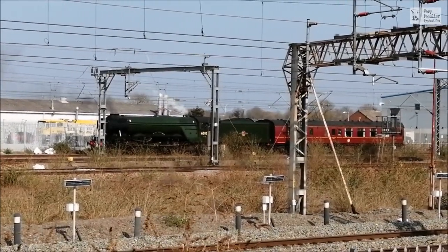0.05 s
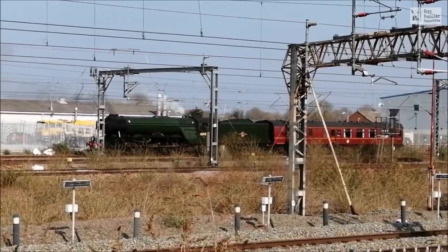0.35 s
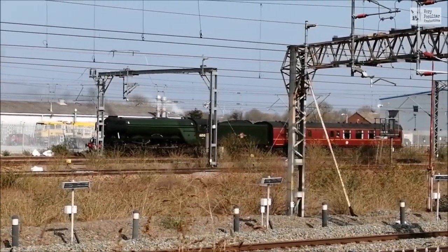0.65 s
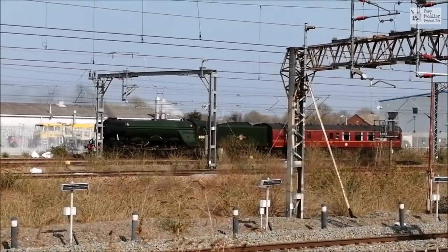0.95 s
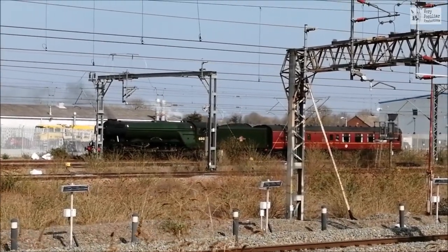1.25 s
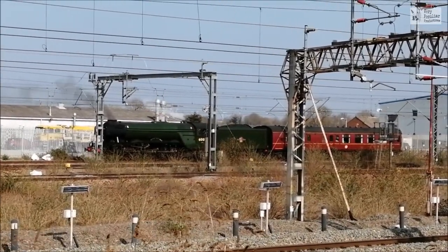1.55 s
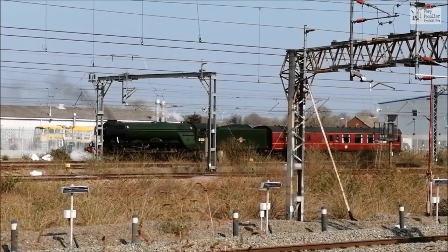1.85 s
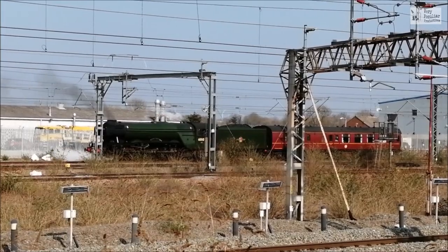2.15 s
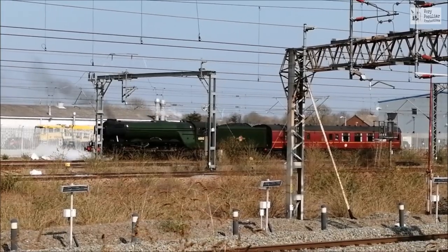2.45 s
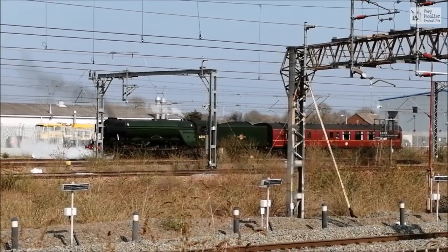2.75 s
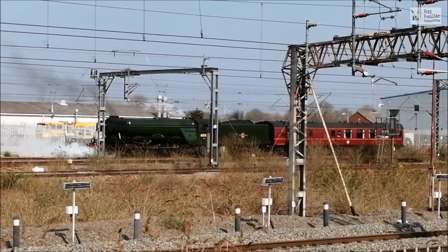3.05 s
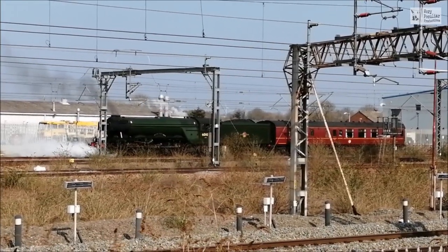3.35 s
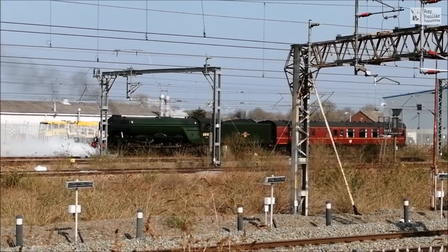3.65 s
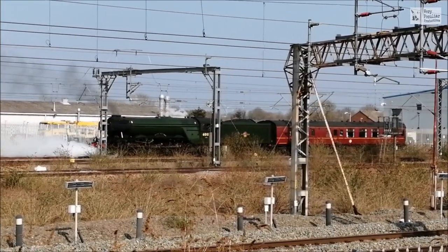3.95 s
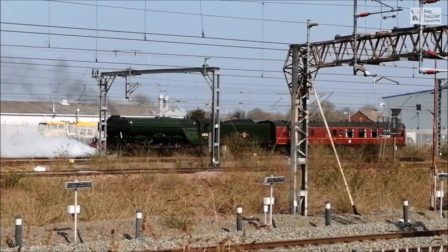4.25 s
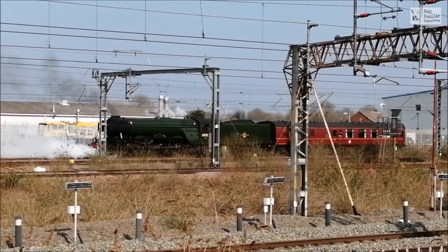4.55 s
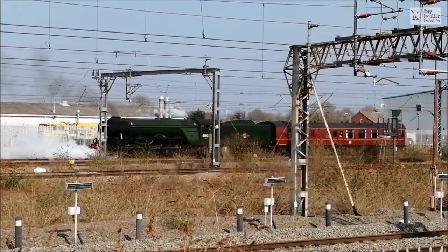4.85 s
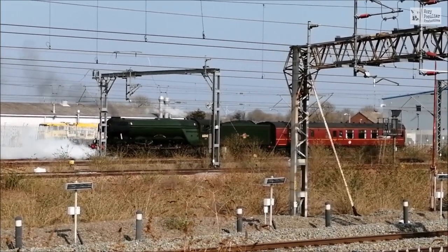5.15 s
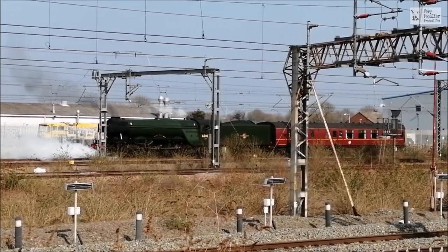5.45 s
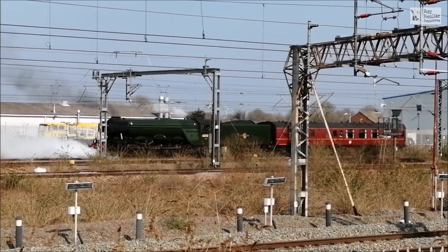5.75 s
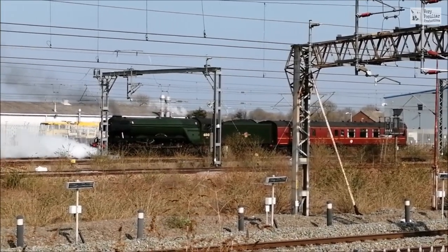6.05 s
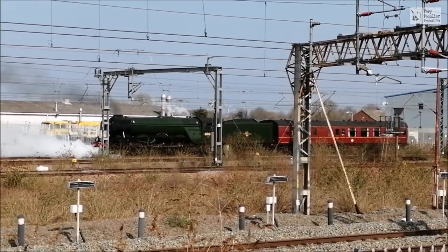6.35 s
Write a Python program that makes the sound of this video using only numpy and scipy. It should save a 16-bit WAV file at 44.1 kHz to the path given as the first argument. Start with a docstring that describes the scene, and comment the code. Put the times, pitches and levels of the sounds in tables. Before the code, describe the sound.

Low wind rumble and pops on the microphone, followed by a light clank and the sustained hiss of a far-off locomotive venting steam.

```python
"""A steam locomotive, heard from across a railway yard on a camera's two microphone ports.
Gusts buffet the ports at once, hardest at the start, while steam leaks softly far off, swells and settles.
At 1.6 s the linkage clanks and the first cylinder drain cock opens; the second follows at 2 s.
Their jet blows a broad, steady hiss to the end, drifting in the moving air,
with wind rumbling on the microphone and the low hum of the yard underneath."""
import sys
import numpy as np
from scipy import signal
from scipy.fft import rfft, irfft
from scipy.io import wavfile
from scipy.ndimage import uniform_filter1d

SR = 44100
rng = np.random.default_rng(int(sys.argv[2]) if len(sys.argv) > 2 else 0)


def transcribe(u):
    """Save the signal u as a 16-bit wav file named by the first command-line argument.

    u: samples, shape (n,) or (channels, n), limited to [-1, 1]; the rate is SR.
    q: integer samples, one column per channel.
    """
    v = np.clip(np.atleast_2d(u).T, -1, 1)
    q = np.round(v * 32767).astype(np.int16)
    wavfile.write(sys.argv[1], SR, q)


N = 291060
TIME = np.arange(N) / SR
BINS = np.fft.rfftfreq(N, 1 / SR)
COCKS_OPEN_S = (1.617, 1.996)


# The jet's roar, body, hiss and fizz. Each row: low edge in Hz, high edge in Hz.
JET_BANDS = [(600, 1500), (1600, 3600), (4200, 7400), (8000, 14500)]
# The jet's spectrum from across the yard. Each row: frequency in Hz, relative level in dB.
JET_SPECTRUM = [(100, -23), (300, -17), (500, -15), (1000, -14), (1800, -11), (2800, -7), (4000, -5),
                (5200, 0), (7000, -8.5), (7450, -13), (7800, -22.5), (9900, -24), (11000, -33.5),
                (15000, -37.5)]
# The jet leans from port to port. Each row: time in seconds, lean to the left in dB.
JET_LEAN = [(1.8, 8), (2.3, 3.5), (2.52, 4.5), (2.87, -1.5), (3.25, 4), (3.65, -2.5), (5.8, -2.5),
            (6.08, 2), (6.5, 0)]
def jet(opening_s=.04, roar_lean=0.84, hiss_pan_db=0.8, patchy_db=1.5):
    """The drain cocks blow: the middle of the spectrum comes first, roar and fizz as the jet builds."""
    steam = pipes_and_ports(distant_noise(JET_SPECTRUM))
    own_db = 20 * np.log10([[band_rms(steam, band)] for band in JET_BANDS])
    hz, t, frames = short_time(steam)
    levels_db = jet_levels(t) + 20 * np.log10(np.maximum(cock_opening(t), .01))
    centres = np.sqrt(np.prod(JET_BANDS, axis=1))
    # each frequency blends the bands on either side of it
    shares = np.array([at_hz(list(zip(centres, row)), hz) for row in np.eye(len(JET_BANDS))]).T
    swell_db = shares @ (levels_db - own_db) + jet_resonances(hz, t)
    lean = at_time(JET_LEAN, t)[0]
    roar_pan, hiss_pan = roar_lean * lean, lean + hiss_pan_db
    lean_db = shares @ np.array([roar_pan, (roar_pan + hiss_pan) / 2, hiss_pan, 0 * t])  # fizz stays put
    steam = waveform(frames * amp(swell_db) * sides(lean_db).reshape(frames.shape))
    onset = np.clip((TIME - COCKS_OPEN_S[0]) / opening_s, 0, 1)
    return moving_air(steam, patchy_db) * onset


# How roar, body, hiss and fizz build once a cock opens.
# Each row: lag in seconds, rise in seconds, gain in dB with only the first cock open.
BAND_BUILD = [(0.024, 0.1, -3), (0, 0.16, -3), (0.076, 0.12, -8), (0.11, 0.55, -14)]
def cock_opening(t):
    """Gain of each band of the jet as first one cock opens, then the other."""
    gains = []
    for lag_s, rise_s, first_db in BAND_BUILD:
        first, second = (np.clip((t - s - lag_s) / rise_s, 0, 1) for s in COCKS_OPEN_S)
        gains.append(amp(first_db) * first + (1 - amp(first_db)) * second)
    return np.array(gains)


# Three bands of the jet drift on their way over the yard. Each row: time in seconds, level in dB.
ROAR_DRIFT = [(1.7, -52), (2.05, -46), (2.4, -44), (3.05, -42), (3.28, -47.5), (3.58, -39), (4.1, -43.5),
              (4.5, -37.5), (5.15, -45.5), (5.5, -43), (5.78, -39.5), (6.0, -47), (6.25, -44), (6.42, -40)]
BODY_DRIFT = [(1.9, -30.5), (2.08, -27), (2.3, -31.5), (2.53, -27.5), (2.75, -34.5), (2.95, -29),
              (3.1, -32.5), (3.3, -29), (3.7, -32), (4.05, -27), (4.35, -28.5), (4.55, -28.5), (4.8, -32),
              (5.03, -27), (5.18, -36), (5.6, -33), (5.84, -26.5), (5.97, -33), (6.48, -32.5), (6.6, -36.5)]
HISS_DRIFT = [(2.2, -28), (2.56, -28), (2.72, -30), (2.93, -29.5), (3.07, -25), (3.36, -31), (3.53, -33.5),
              (3.68, -31), (3.83, -32), (4.5, -34.5), (4.68, -31), (4.95, -32.5), (5.1, -29), (5.54, -31),
              (5.68, -37), (5.89, -29.5), (6.3, -39), (6.55, -31.5)]
# Short spurts of fizz. Each row: centre in seconds, half length in seconds, rise in dB.
FIZZ_SPURTS = [(1.82, 0.04, 9), (2.096, 0.047, 10), (2.38, 0.043, 2), (2.602, 0.037, 7), (2.88, 0.063, 4.5),
               (3.074, 0.1, 6), (3.605, 0.07, 3), (4.163, 0.14, 11.5), (5.1, 0.067, 8), (5.247, .1, 7),
               (5.723, 0.058, 7.5), (5.956, 0.066, 7.5)]
def jet_levels(t, fizz_db=-56.0, fizz_follows=0.31, flicker_db=1.7, flicker_hz=10):
    """Levels of roar, body, hiss and fizz in dB; the fizz follows the hiss, flickers and spurts."""
    roar, body, hiss = (at_time(curve, t)[0] for curve in (ROAR_DRIFT, BODY_DRIFT, HISS_DRIFT))
    mean_hiss = np.mean(HISS_DRIFT, axis=0)[1]
    flicker = flicker_db * np.interp(t, TIME, wander(flicker_hz))
    spurts = sum(db * swell(t, s, half_s) for s, half_s, db in FIZZ_SPURTS)
    fizz = fizz_db + fizz_follows * (hiss - mean_hiss) + flicker + spurts
    return np.array([roar, body, hiss, fizz])


# The whistling edge of the hiss. Each row: time in seconds, relative level in dB.
WHISTLE_DRIFT = [(2.15, -4), (2.5, 0), (3.0, -5.5), (3.28, 4.5), (3.45, 3), (3.6, -0.5), (4.35, 1.5),
                 (5.1, 0), (5.6, 3), (6.12, 1), (6.45, 1)]
def jet_resonances(hz, t, whistle_hz=5220, whistle_db=-0.5, rush_hz=2830, rush_db=4):
    """Extra dB: a narrow rush as the first cock opens, and a whistling edge that comes and goes."""
    rush_level = rush_db * swell(t, COCKS_OPEN_S[0], half_width=0.31)
    rush = np.outer(swell(hz, rush_hz, half_width=280), rush_level)
    whistle_level = whistle_db + at_time(WHISTLE_DRIFT, t)[0]
    whistle = np.outer(swell(hz, whistle_hz, half_width=240), whistle_level)
    return rush + whistle


# Blows of the cock linkage, far off. Each row: start in seconds, relative level in dB.
LINKAGE_BLOWS = [(1.583, -44.5), (1.592, -34.5), (1.602, -39), (1.614, -63)]
# Its ring. Each row: frequency in Hz, relative level in dB, seconds to fall by 60 dB.
LINKAGE_MODES = [(614, 0, .08), (807, -13, .14), (1357, -11, .12), (1550, -9, .08), (2056, -20, .15),
                 (2756, -14, .12), (2912, -17, .15), (5050, -9, .11)]
# Its scrape. Each row: frequency in Hz, relative level in dB.
SCRAPE_SPECTRUM = [(150, -20), (500, -2), (1300, 0), (2000, -9), (3000, -6), (4000, -15), (5200, -12),
                   (7200, -13), (8200, -33), (10000, -33), (11000, -48), (15000, -52)]
def clank(ring_db=6.5, scrape_db=4.5, scrape_t60=0.035, rise_s=0.00063, echo_db=-14, echo_t60=0.29):
    """The cock linkage scrapes and knocks over; the yard returns a short echo."""
    ring, scrape_level = np.zeros((2, N))
    age = np.arange(SR // 2) / SR
    for s, db in LINKAGE_BLOWS:
        blow = amp(db) * (1 - np.exp(-age / rise_s))
        rub = amp(-60 * age / scrape_t60) + amp(echo_db - 60 * age / echo_t60)
        modes = sum(amp(mode_db - 60 * age / t60) * np.sin(2 * np.pi * (hz * age + rng.random()))
                    for hz, mode_db, t60 in LINKAGE_MODES)
        ring += np.interp(TIME, s + age, blow * modes, right=0)
        scrape_level += np.interp(TIME, s + age, blow * rub, right=0)
    scrape = scrape_level * distant_noise(SCRAPE_SPECTRUM)
    return sides(pan_db=4) * (amp(ring_db) * ring + amp(scrape_db) * scrape)


# The leak's spectrum from across the yard. Each row: frequency in Hz, relative level in dB.
LEAK_SPECTRUM = [(300, -17), (700, -13), (1200, -7), (2200, -10), (2800, -7), (3900, -7), (5200, 1.5),
                 (7000, -9.5), (7900, -24.5), (10000, -30), (11000, -35.5)]
# Its one swell. Each row: time in seconds, drive in dB, which LEAK_RESPONSE scales.
LEAK_DRIVE = [(0, -78), (.4, -70.5), (.63, -49.5), (.75, -48), (1.06, -55.5), (1.56, -56)]
# How the spectrum follows the swell. Each row: frequency in Hz, dB of change per dB of drive.
LEAK_RESPONSE = [(1000, 0), (2800, 0.55), (5200, 0.66), (9500, 0.76), (12000, 0.3)]
def leak(level_db=-1.2, pan_db=5.0, settled_db=-55):
    """A soft escape of steam, off to the left, that swells once, brightening as it does, and settles."""
    steam = pipes_and_ports(distant_noise(LEAK_SPECTRUM)) * sides(pan_db)
    hz, t, frames = short_time(steam / band_rms(steam, JET_BANDS[2]))
    swell_db = np.outer(at_hz(LEAK_RESPONSE, hz), at_time(LEAK_DRIVE, t)[0] - settled_db)
    return moving_air(waveform(frames * amp(settled_db + swell_db + level_db)))


# Peaks and dips of the drain pipes, and those the camera body gives each microphone port.
# Each row: frequency in Hz, half width in Hz, gain in dB.
PIPE_PEAKS = [(612, 12, 3), (778, 18, 3), (1000, 16, -3), (1088, 14, 3), (1450, 30, -3), (1604, 24, 3),
              (1745, 35, -2.5), (2190, 40, 2), (2870, 35, 2), (3110, 35, -2.5), (4030, 55, 2),
              (5115, 45, 2), (5630, 45, 2.5), (5820, 45, 2.5), (6204, 30, 3.5), (6682, 35, 2.5),
              (8150, 90, 2)]
LEFT_PORT_PEAKS = [(769.0, 14.0, 3.3), (963.0, 50.0, -3.3), (1448.0, 62.0, -4.0), (2174.0, 116.0, 5.3),
                   (2697.0, 168.0, 12.5), (3258.0, 106.0, 8.1), (4111.0, 253.0, -7.7), (4466.0, 126.0, 4.4),
                   (5142.0, 108.0, 2.3), (6857.0, 281.0, 4.5)]
RIGHT_PORT_PEAKS = [(803.0, 118.0, 4.7), (889.0, 54.0, -3.3), (1229.0, 127.0, 6.3), (1648.0, 148.0, 8.5),
                    (2185.0, 198.0, 8.3), (2324.0, 56.0, -5.3), (2899.0, 222.0, 10.6), (3419.0, 132.0, 6.0),
                    (3878.0, 48.0, -4.5), (4324.0, 73.0, -7.8), (4548.0, 93.0, 3.2), (5274.0, 136.0, 4.2),
                    (6019.0, 152.0, -5.8), (6396.0, 87.0, -4.4)]
def pipes_and_ports(pair, echo_gain=.11, echo_s=.0118):
    """The pipes ring, one reflection combs the sound, and the camera body colours each side."""
    comb = 1 + echo_gain * np.exp(-2j * np.pi * BINS * echo_s)
    ports = np.array([peak_gain(LEFT_PORT_PEAKS), peak_gain(RIGHT_PORT_PEAKS)])
    return irfft(rfft(pair) * peak_gain(PIPE_PEAKS) * comb * ports, N)


def moving_air(pair, patchy_db=1.25, ripple_db=1.5):
    """Turbulence fades broad patches of the spectrum; shifting echo paths add a finer, slower ripple."""
    _, _, frames = short_time(pair)
    broad, fine = rng.standard_normal((2, *frames.shape))  # each is (port, frequency, time)
    broad, fine = broad + broad.mean(0), fine + fine.mean(0)  # partly shared by both ports
    for _ in range(2):
        broad = uniform_filter1d(uniform_filter1d(broad, size=12, axis=1), size=14, axis=2)
        fine = uniform_filter1d(uniform_filter1d(fine, size=2, axis=1), size=30, axis=2)
    return waveform(frames * amp(patchy_db * unit(broad) + ripple_db * unit(fine)))


# How alike the ports hear a far source. Each row: frequency in Hz, coherence from 0 to 1.
PORT_COHERENCE = [(100, .8), (1400, .7), (2200, .83), (2850, .85), (3020, .45), (3200, .8), (4500, .78),
                  (6300, .65), (6600, .85), (6900, .4), (7700, .95), (9000, .8), (15000, .85)]
# How far the left port leads. Each row: frequency in Hz, phase in radians.
LEFT_LEAD = [(400, .1), (1000, .8), (2400, .8), (2650, 1.3), (2900, .4), (3100, 2.3), (3350, 1.3),
             (3700, 1.9), (4000, 1), (4250, 2.6), (4400, 1), (4800, 1.9), (5200, 1.9), (5550, 3.4),
             (6000, 2.8), (6300, .2), (8000, 0)]
def distant_noise(spectrum):
    """Noise from across the yard, reaching the two ports partly alike and out of step."""
    left, other = rfft(rng.standard_normal((2, N)))
    same = np.clip(at_hz(PORT_COHERENCE, BINS), 0, .99)
    lag = np.exp(-1j * at_hz(LEFT_LEAD, BINS))
    right = (same * left + np.sqrt(1 - same ** 2) * other) * lag
    return unit(irfft(np.array([left, right]) * amp(at_hz(spectrum, BINS)), N))


# Middling wind, right on the microphone. Each row: frequency in Hz, relative level in dB.
WIND_SPECTRUM = [(10, 0.5), (30, -0.5), (65, 0), (130, -1.5), (200, -4.5), (300, -10), (450, -28.5),
                 (700, -51), (1500, -65), (4000, -76)]
def wind(level_db=0.5, middling_db=-32, db_per_octave=55, slowest=0.815, lumpy_db=4.0, low_cut_hz=24):
    """Each port has its own eddies; a stronger gust makes them faster, and so brighter."""
    pair = []
    port_speeds = (1.09, 0.84)  # the left port sounds brighter
    for strength, port_speed in zip(amp(level_db) * wind_strength(), port_speeds):
        hz, t, frames = short_time(rng.standard_normal(N))
        strength_db = 20 * np.log10(np.interp(t, TIME, strength))
        speed = port_speed * 2 ** ((strength_db - middling_db) / db_per_octave)
        colour = amp(at_hz(WIND_SPECTRUM, hz[:, None] / np.maximum(speed, slowest)))
        rumble = waveform(frames * colour) * amp(lumpy_db * wander(rate_hz=40))
        # the microphone sheds the deepest bass
        rumble = irfft(rfft(rumble) * BINS / np.hypot(BINS, low_cut_hz), N)
        running_rms = np.sqrt(uniform_filter1d(rumble ** 2, size=3000))
        pair.append(strength * rumble / running_rms)
    return np.array(pair)


# The breeze at the camera. Each row: time in seconds, relative level in dB, left over right in dB.
BREEZE = [(0, -24, 8), (.27, -26.5, 6.5), (.47, -33.5, -0.5), (.75, -28.5, -3), (1.08, -39, 0),
          (1.52, -40.5, -1.5), (1.8, -40, 0.5), (2.1, -36.5, -14), (2.4, -35.5, -2), (3.1, -35.5, -3.5),
          (3.3, -40.5, 4), (3.8, -40, -9), (4.07, -44.5, -3), (4.3, -36.5, -12), (4.85, -47, -12),
          (5.25, -57, -2), (5.55, -46, -10), (6.2, -51, 8), (6.6, -38, -3.5)]
# Gusts. Each row: centre in seconds, half length in seconds, relative level in dB, left over right in dB.
WIND_GUSTS = [(0.349, 0.018, -20, 11), (0.427, .012, -28, 17), (.51, 0.016, -30, 8),
              (0.643, 0.022, -31.5, 11), (0.733, 0.019, -24, 2.5), (0.839, 0.032, -24.5, 1.5),
              (1.397, 0.026, -30.5, 13), (1.881, 0.029, -25, 9), (1.966, 0.024, -25, 4.5),
              (2.338, 0.075, -28, -0.5), (2.433, .055, -24, -6), (2.794, .04, -25, -4),
              (2.944, 0.014, -26, -21), (3.19, 0.032, -33, -17), (3.42, 0.039, -34.5, 1),
              (3.577, 0.017, -30.5, -3), (3.755, 0.079, -33.5, -22), (4.185, 0.022, -32.5, -24),
              (4.611, 0.052, -32.5, -8), (5.73, 0.11, -35.5, -26), (5.858, 0.014, -33.5, -22),
              (6.09, 0.032, -42.5, 17)]
def wind_strength(unsteady_db=2.3, unsteady_hz=10):
    """Strength of the wind at each port: an unsteady breeze with gusts on top."""
    breeze_db, pan_db = at_time(BREEZE, TIME)
    unsteady = np.array([wander(unsteady_hz), wander(unsteady_hz)])
    power = (amp(breeze_db + unsteady_db * unsteady) * sides(pan_db)) ** 2
    for s, half_s, db, gust_pan_db in WIND_GUSTS:
        power += (amp(db) * sides(gust_pan_db)) ** 2 * swell(TIME, s, half_s)
    return np.sqrt(power)


# The hardest eddies to hit the microphone.
# Each row: centre in seconds, relative peak in dB, left over right in dB, brightness in dB.
HARD_EDDIES = [(.018, -23, 19, -17), (.036, -20, 29, 4), (0.052, -30, 22, -1), (0.082, -20, 11, -18),
               (0.098, -23, 20, -17), (.121, -25, 14, -24), (.173, -20.5, 20, -6), (.194, -22, 30, -16),
               (.215, -24, 25, -15), (0.23, -19.5, 33, -16), (.243, -19, 34, -18.5), (.314, -21.5, 27, -27),
               (0.327, -21.5, 30, -24), (.345, -14.5, 37, -37), (.359, -23, 25, -23),
               (.634, -21, 26, -43.5), (.944, -22.5, 18, -62), (1.413, -20.5, 29, -48),
               (1.665, -21, 25, -40), (1.875, -22, 21, -49), (2.299, -22.5, 14, -41), (3.01, -22, 25, -5),
               (3.026, -23.5, 16, -14)]
def buffets(level_db=2, corner_hz=1100, db_per_octave=22, low_hz=190, crackle_db=2, half_s=0.0069):
    """An eddy breaks on a port: a short dull pop, or a brighter crackle when it is fast."""
    pair = np.zeros((2, N))
    t = (np.arange(4096) - 2048) / SR
    hz = np.fft.rfftfreq(len(t), 1 / SR)
    for s, db, pan_db, bright_db in HARD_EDDIES + flurry():
        top_hz = corner_hz * 2 ** (bright_db / db_per_octave)
        colour = hz ** 2 / (hz ** 2 + low_hz ** 2) / (1 + (hz / top_hz) ** 4)
        air, lumps = rng.standard_normal((2, len(t)))
        air *= amp(crackle_db * unit(uniform_filter1d(lumps, size=90)))
        burst = irfft(rfft(air * swell(t, 0, half_s)) * colour)
        burst /= abs(burst).max()
        pair += sides(pan_db) * amp(db + level_db) * np.interp(TIME, s + t, burst, left=0, right=0)
    return pair


def flurry(count=8, length_s=.36, peak_db=-25.5, pan_db=26, bright_db=-23):
    """Small eddies in quick, uneven succession in the first gust, as rows like those of HARD_EDDIES."""
    times = (np.arange(count) + rng.random(count)) * length_s / count
    peaks = rng.normal(peak_db, 2, count)
    brightness = rng.normal(bright_db, 4, count)
    return [(s, db, pan_db, bright) for s, db, bright in zip(times, peaks, brightness)]


# The far hum of the yard. Each row: frequency in Hz, relative level in dB.
YARD_SPECTRUM = [(20, 1.5), (100, 6.5), (300, -15), (600, -1), (1000, -18.5), (2500, -20.5), (4000, -43),
                 (8000, -41), (15000, -60)]
def yard(level_db=-54):
    """Low, even background of the railway yard."""
    return amp(level_db) * distant_noise(YARD_SPECTRUM)


def amp(db):
    """Decibels to gain."""
    return 10 ** (np.asarray(db) / 20)


def unit(x):
    """Scales to rms 1."""
    return x / np.sqrt(np.mean(x ** 2) + 1e-20)


def at_hz(points, hz):
    """Reads a table on a log-frequency axis."""
    row_hz, value = np.transpose(points)
    return np.interp(np.log(hz + 1), np.log(row_hz + 1), value)


def at_time(rows, t):
    """Reads every column of a curve at the times t."""
    s, *columns = np.transpose(rows)
    return np.array([np.interp(t, s, column) for column in columns])


def sides(pan_db):
    """Left and right gains of mean power 1; positive is to the left."""
    pair = amp(np.array([pan_db, -pan_db]).reshape(2, -1) / 2)
    return pair / np.sqrt(np.mean(pair ** 2, axis=0))


def wander(rate_hz):
    """Smooth random drift of rms 1, up to about the given rate."""
    return unit(irfft(rfft(rng.standard_normal(N)) / (1 + (BINS / rate_hz) ** 4), N))


def swell(x, centre, half_width):
    """A smooth rise and fall that peaks at 1 at the centre."""
    return np.exp(-((x - centre) / half_width) ** 2)


def peak_gain(peaks):
    """Gain over frequency of a set of peaks and notches."""
    return amp(sum(db * np.exp(-((BINS - hz) / width) ** 2 / 2) for hz, width, db in peaks))


def band_rms(pair, band):
    """Strength of the centre signal within a band."""
    inside = (BINS > band[0]) & (BINS < band[1])
    return np.sqrt(2 * np.sum(abs(rfft(pair.mean(0))[inside]) ** 2)) / N


def short_time(x):
    """Short-time spectra: frequencies in Hz, times in seconds, frames."""
    return signal.stft(x, SR, nperseg=1024, noverlap=768)


def waveform(frames):
    """Short-time spectra back to sound."""
    return signal.istft(frames, SR, nperseg=1024, noverlap=768)[1][..., :N]


def scene():
    """Steam and linkage far off across the yard, wind right on the microphone."""
    return leak() + clank() + jet() + yard() + wind() + buffets()


def record(dry, fade_s=.003, edge_hz=15300):
    """A brief fade-in, then the recorder's band limit."""
    faded = dry * np.minimum(TIME / fade_s, 1)
    low_pass = signal.firwin(511, edge_hz, window=("kaiser", 9), fs=SR)
    return signal.oaconvolve(faded, low_pass[None], "same")


dry = scene()
out = record(dry)
transcribe(out)
```